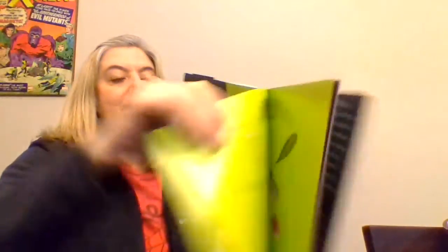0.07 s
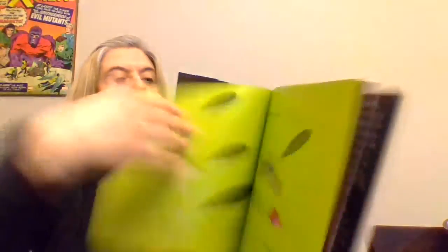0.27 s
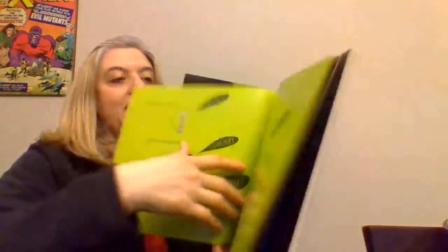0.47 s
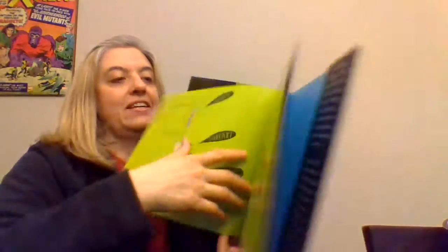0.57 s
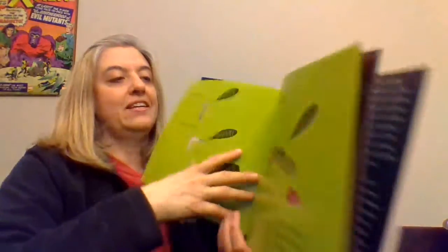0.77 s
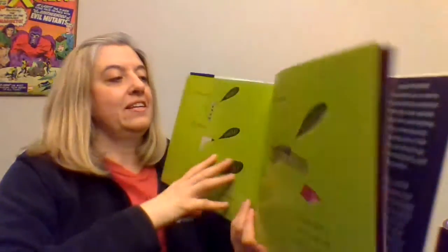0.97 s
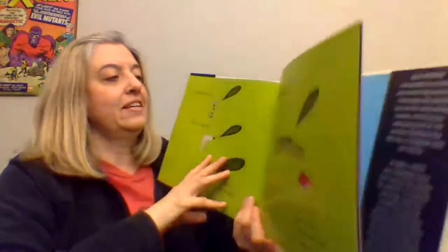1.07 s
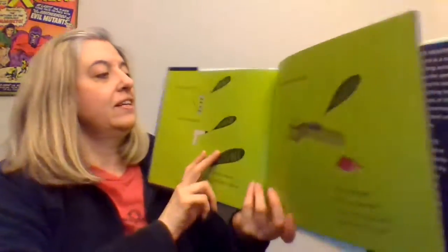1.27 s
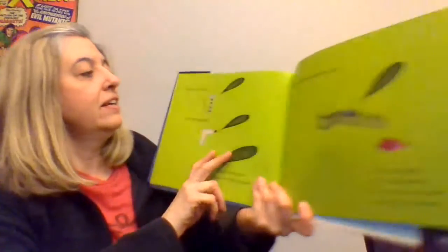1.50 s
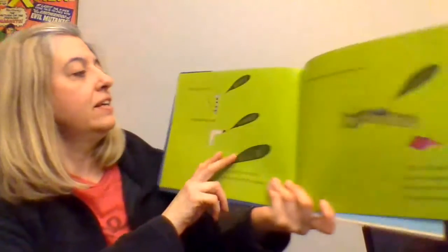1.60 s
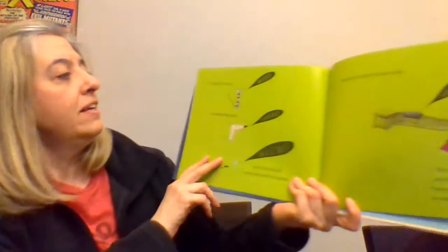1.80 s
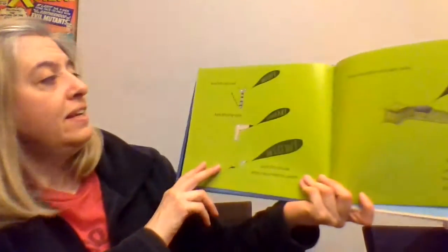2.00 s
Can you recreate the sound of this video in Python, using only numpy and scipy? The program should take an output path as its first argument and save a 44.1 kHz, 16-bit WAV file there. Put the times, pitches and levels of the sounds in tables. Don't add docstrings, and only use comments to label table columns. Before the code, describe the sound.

Close page turn of a glossy picture book: a brief rustle, a dense burst of snapping and buckling paper, then near quiet with soft taps and skin slides on paper, over faint steady room hiss.

```python
import sys
import numpy as np
from scipy import signal
from scipy.fft import rfft, irfft, next_fast_len
from scipy.io import wavfile
from scipy.ndimage import uniform_filter1d

SR = 44100
rng = np.random.default_rng(int(sys.argv[2]) if len(sys.argv) > 2 else 0)


def dump_mix(stems):
    frames = np.atleast_2d(stems).T
    limited = np.clip(frames, -1, 1)
    pcm = np.round(limited * 32767).astype(np.int16)
    wavfile.write(sys.argv[1], SR, pcm)


def to_linear_factor(level_db):
    exponent = np.asarray(level_db, float) / 20
    return 10 ** exponent


N = 90404
LEN = 8192


def unit(x):
    return x / np.sqrt(np.mean(x ** 2, axis=-1, keepdims=True) + 1e-20)


def peak_unit(x, window):
    power = uniform_filter1d(x ** 2, size=window)
    return x / np.sqrt(power.max(axis=1, keepdims=True))


def along(points, hz):
    f, v = np.transpose(points)
    return np.interp(np.log(hz + 1), np.log(f + 1), v)


def curves(rows):
    s, *cols = np.transpose(rows)
    return [np.interp(np.arange(N) / SR, s, c) for c in cols]


def filtered(x, response):
    m = next_fast_len(x.shape[-1] + LEN)
    spectrum = rfft(x, m) * response(np.fft.rfftfreq(m, 1 / SR))
    return irfft(spectrum, m)[..., :x.shape[-1]]


def peak(f, hz, width):
    return 1j * f * width / (hz * hz - f * f + 1j * f * width)


def mode_sum(f, modes):
    return sum((-1) ** k * to_linear_factor(db) * peak(f, hz, width) for k, (hz, width, db) in enumerate(modes))


def grit(shape, spiky):
    size = unit(uniform_filter1d(rng.standard_normal(shape), size=24, axis=-1))
    return unit(rng.standard_normal(shape) * np.exp(spiky * size / 2))


def patchy(x, depth_db, bins=5, frames=10):
    z = signal.stft(x, nperseg=256)[2]
    field = uniform_filter1d(rng.standard_normal(z.shape), max(int(bins), 1), axis=0)
    field = uniform_filter1d(field, int(frames), axis=1)
    gain = to_linear_factor(depth_db * field / field.std())
    return unit(signal.istft(z * gain, nperseg=256)[1][:N])


def placed(times, sounds):
    at = np.round(times * SR).astype(int)[:, None] + np.arange(LEN)
    return np.bincount(at.ravel(), sounds.ravel(), N + LEN)[:N]


def slip_bursts(rows, slap_db, q):
    s, db, hz, length = np.transpose(rows)[:, :, None]
    t = np.arange(LEN) / SR
    attack_s, release_s = 0.0055, 0.058
    kick, kick_s = 1.29, 0.0023
    shape = 1 - np.exp(-t / attack_s) + kick * np.exp(-t / kick_s)
    release = to_linear_factor(-60 * np.maximum(t - length, 0) / release_s)
    push = grit((len(rows), LEN), 0.44) * shape * release
    overtone_hz, overtone_db = 1.96 * hz, -18.5
    slap_low_hz = 430 * hz / 1000
    slap_top_hz = 1950 * (hz / 1000) ** 0.52

    def span(f):
        ring = peak(f, hz, hz / q) ** 2 + to_linear_factor(overtone_db) * peak(f, overtone_hz, hz / q) ** 2
        above = (1j * f / (slap_low_hz + 1j * f)) ** 3
        below = (slap_top_hz / (1j * f + 0.00088) * peak(f, slap_top_hz, 1.28 * slap_top_hz)) ** 3
        return ring + to_linear_factor(slap_db) * above * below

    bursts = peak_unit(filtered(push, span), 200)
    return placed(s[:, 0], to_linear_factor(db - 5) * bursts)


def hush():
    # f/Hz, density level/dB
    spectrum = [(30, -3.5), (340, 5.5), (800, -6.5), (2000, -14.5), (15800, -10.5)]
    noise = filtered(rng.standard_normal(N), lambda f: to_linear_factor(along(spectrum, f)))
    return to_linear_factor(-67.5) * patchy(noise, depth_db=2.0)


def touches():
    # t/s, peak level/dB, pitch f/Hz, length/s
    small_bursts = [(0, -51, 1900, 0.0046), (.115, -41.5, 2100, 0.03), (.165, -35.5, 2000, 0.025),
                    (1.066, -24.5, 680, 0.0067), (1.179, -42, 1200, 0.019), (1.359, -37, 1020, 0.022),
                    (1.39, -36.5, 804, 0.025), (1.2, -50.5, 1350, 0.11), (1.452, -37, 1510, 0.01),
                    (1.614, -42, 816, 0.022), (1.657, -43, 1760, 0.0073), (1.676, -48, 950, 0.052),
                    (1.68, -41.5, 2020, 0.017), (1.847, -48, 2040, 0.011), (.430, -29, 1500, 0.03),
                    (.686, -26, 1960, 0.0069), (1.068, -36.5, 1870, 0.016), (1.360, -40.5, 1800, 0.03)]
    low_hz = 420
    bursts = slip_bursts(small_bursts, slap_db=-21.5, q=1.54)
    return filtered(bursts, lambda f: (f / (f - 1j * low_hz)) ** 4)


def flex():
    # t/s, level/dB
    effort = [(0, -54), (.025, -103), (.07, -73), (.13, -38.5), (.21, -51), (.3, -44.5), (.39, -52),
              (.42, -72.5), (.435, -27.5), (.6, -30.5), (.68, -27.5), (.72, -41), (.78, -35), (.93, -49),
              (.99, -78.5)]
    # f/Hz, width/Hz, level/dB
    sheet_modes = [(537.3, 69, 8), (736, 490, -0.5), (1080, 234, 5), (1500, 120, -1.5), (1793, 170, 1.5)]
    (effort_db,) = curves(effort)
    rustle = filtered(grit(N, 0.79), lambda f: mode_sum(f, sheet_modes) * peak(f, 620, 1500))
    rustle = patchy(rustle, depth_db=4.0, bins=2.5, frames=9.8)
    flutter = filtered(rng.standard_normal(N), lambda f: peak(f, 220, 530) ** 2)
    flutter = patchy(flutter, depth_db=-1, bins=1.5, frames=4.3)
    return to_linear_factor(effort_db) * (rustle + to_linear_factor(-16.5) * flutter)


def slide():
    # t/s, finger speed level/dB, scratch level over it/dB
    turning_hand = [(.04, -111.5, 33), (.06, -56, 10), (.09, -47.5, -1), (.2, -45.5, -4.5), (.32, -45, -7),
                    (.35, -63.5, 3.5), (.45, -55.5, 3.5), (.5, -36.5, -2.5), (.57, -41.5, -2.5),
                    (.7, -39.5, -8), (.74, -50, 4.5), (.77, -40, -6.5), (.81, -53, 6), (.84, -44.5, -5),
                    (.92, -50.5, -6)]
    # t/s, finger speed level/dB, scratch level over it/dB
    holding_hand = [(1.05, -46.5, -7.5), (1.2, -59.5, 1.5), (1.29, -49.5, -2), (1.33, -51, 0),
                    (1.345, -54.5, -5), (1.4, -47, -5.5), (1.47, -57, 0.5), (1.57, -64, 1.5),
                    (1.646, -55.5, -9.5), (1.664, -50, 0), (1.84, -50.5, -9), (1.853, -47.5, -2),
                    (1.899, -42.5, -1.5), (1.94, -55, -2.5), (2.05, -73, 1)]
    # f/Hz, density level/dB
    gloss = [(5000, -86), (7000, -3.5), (8000, -8.5), (9300, -1.5), (12000, -2), (14600, 3.5),
             (16000, -3.5)]
    # f/Hz, width/Hz, level/dB
    scratch_modes = [(2490, 1200, -6.5), (3300, 196, 7), (4000, 1070, 2.5), (5160, 800, 2.5),
                     (6440, 234, 6)]
    speed_db, scratch_db = curves(turning_hand + holding_hand)
    hiss = filtered(grit(N, 0.14), lambda f: to_linear_factor(along(gloss, f)))
    hiss = patchy(hiss, depth_db=2.0, bins=77, frames=14)
    scratch = filtered(grit(N, 0.33), lambda f: mode_sum(f, scratch_modes) * peak(f, 4100, 10000))
    scratch = patchy(scratch, depth_db=5, bins=1.2, frames=30)
    crackle = unit(filtered(grit(N, 0.9), lambda f: peak(f, 3020, 3300) ** 2))
    flying = to_linear_factor(-6.5) * scratch + crackle
    held = scratch + to_linear_factor(-12) * crackle
    turning = np.arange(N) / SR < turning_hand[-1][0]
    return to_linear_factor(speed_db) * (hiss + to_linear_factor(scratch_db) * np.where(turning, flying, held))


def buckles():
    # t/s, peak level/dB, pitch f/Hz, length/s
    page_turn = [(0.056, -41, 1870, 0.035), (0.084, -38, 1030, 0.013), (0.1, -27.5, 2180, 0.027),
                 (0.139, -31, 2160, 0.027), (0.15, -42, 1100, 0.022), (0.23, -28, 1070, 0.013),
                 (0.262, -25.5, 1370, 0.007), (0.296, -28.5, 463, 0.013), (0.322, -26, 620, 0.013),
                 (0.413, -27, 750, 0.045), (0.427, -19, 910, 0.0067), (0.445, -20, 970, 0.014),
                 (0.463, -35.5, 630, 0.012), (0.489, -26.5, 685, 0.041), (0.522, -25.5, 1080, 0.0073),
                 (0.545, -25.5, 525, 0.011), (0.56, -32.5, 900, 0.01), (0.607, -25.5, 1300, 0.03),
                 (0.627, -19.5, 497, 0.0245), (0.64, -23, 970, 0.018), (0.664, -20, 890, 0.044),
                 (0.698, -25.5, 1080, 0.0035), (0.718, -24, 1000, 0.038), (0.752, -24, 536, 0.0087),
                 (0.774, -19, 960, 0.004), (0.805, -32.5, 1060, 0.017), (1.668, -42, 595, 0.04)]
    return slip_bursts(page_turn, slap_db=-6.5, q=1.9)


def snaps():
    # t/s, peak level/dB, pitch f/Hz, sizzle level/dB, fray length/s
    creases = [(.086, -25, 3380, -5, 0.0036), (0.137, -24, 3700, -1, 0.0027), (0.146, -27, 3550, 0, 0.0013),
               (0.155, -23.5, 4470, -4, 0.0023), (0.231, -25.5, 3470, -6, 0.014),
               (0.244, -21.5, 3400, -0.5, 0.014), (0.269, -11, 3900, 0, 0.01),
               (0.4704, -18, 5070, 0.5, 0.0023), (.487, -21, 2970, -2, 0.0031),
               (0.4966, -15, 4330, -0.5, 0.0014), (0.511, -22.5, 2950, -2.5, 0.0052),
               (0.526, -13.5, 2980, -3, 0.014), (0.545, -20.5, 4000, -8, .005),
               (.5950, -20.5, 4440, -2.5, 0.0034), (0.6113, -10.5, 7240, -19.5, 0.0018),
               (0.61, -10.5, 2500, -16.5, 0.0035), (0.622, -24, 5800, -12.5, 0.0044),
               (.663, -19, 2900, -10, 0.0027), (.688, -23.5, 3950, -7, 0.0029),
               (.7540, -9, 3700, -7.5, 0.0067), (0.829, -26, 4030, -6.5, 0.0044),
               (1.0656, -28, 3160, -7.5, 0.011), (1.657, -27.5, 3800, -10.5, 0.0027),
               (1.6695, -35, 4130, -10.5, 0.0063)]
    s, db, hz, sizzle_db, fray_s = np.transpose(creases)[:, :, None]
    lead_s, t60_s, q = 0.03, 0.015, 2.38
    t = np.arange(LEN) / SR - lead_s
    core = (t > 0) * to_linear_factor(-60 * abs(t) / t60_s) * grit((len(creases), LEN), 1.0)
    fray = 0.42 * np.exp(-(t / fray_s) ** 2) * grit((len(creases), LEN), 1.0)

    def crease(f):
        return peak(f, hz, hz / q) + to_linear_factor(sizzle_db - 3) * peak(f, 14900, 10000)

    crack = peak_unit(filtered(core + fray, crease), 40)
    return placed(s[:, 0] - lead_s, to_linear_factor(db - 12) * crack)


def pops():
    # t/s, peak level/dB, pitch f/Hz, t60/s
    flips = [(0.087, -30.5, 1020, 0.026), (.1345, -17.5, 2280, 0.011), (0.1371, -25.5, 940, 0.014),
             (.145, -22, 2010, 0.015), (.157, -29, 1200, 0.013), (.163, -19.5, 790, 0.0079),
             (0.2415, -27, 1130, 0.0072), (0.271, -24, 1144, 0.061), (0.2729, -18.5, 1676, .02),
             (0.284, -36, 1400, 0.0051), (.306, -20.5, 634, 0.012), (0.3318, -27, 600, 0.031),
             (.340, -33, 550, 0.025), (0.4273, -8, 973, 0.011), (.471, -27, 900, 0.012),
             (.513, -17.5, 990, 0.0077), (.519, -16, 1080, 0.0098), (0.531, -27, 930, .015),
             (.555, -21, 498, 0.069), (.578, -16, 533, .03), (.590, -21, 910, 0.017),
             (0.6119, -13.5, 1200, .025), (.625, -11.5, 640, 0.0073), (0.684, -13, 1080, 0.033),
             (.6875, -16.5, 1980, 0.024), (.6938, -7, 1070, 0.02), (0.754, -17, 1080, 0.044),
             (.770, -20, 1200, 0.031), (.795, -24, 996, 0.029), (1.3595, -41, 800, 0.028),
             (1.6145, -41.5, 890, 0.017), (1.6625, -28.5, 980, .03), (1.669, -26, 1001, 0.04),
             (1.691, -37, 1010, 0.0067), (1.696, -29, 1950, 0.01)]
    s, db, hz, t60 = np.transpose(flips)[:, :, None]
    t = np.arange(LEN) / SR
    rise_cycles, overtone, overtone_db = 0.58, 1.735, -6.5
    decay_db = -60 * t / t60
    rise = 1 - np.exp(-hz * t / rise_cycles)
    upper = to_linear_factor(overtone_db + decay_db) * np.sin(2 * np.pi * overtone * hz * t)
    ring = np.sin(2 * np.pi * hz * t) - upper
    return placed(s[:, 0], to_linear_factor(db + decay_db) * rise * ring)


def thumps():
    # t/s, peak level/dB, pitch f/Hz
    pushes = [(0.133, -23.5, 249), (0.148, -50, 70), (0.287, -44, 83.6), (0.428, -31.5, 263),
              (0.473, -33, 115), (0.497, -32.5, 70.5), (0.615, -30, 144), (0.762, -48, 120),
              (1.066, -33.5, 113), (1.358, -50.5, 118), (1.414, -46, 124), (1.614, -42.5, 174),
              (1.648, -46.5, 101), (1.697, -46, 109)]
    s, db, hz = np.transpose(pushes)[:, :, None]
    cycles = hz * np.arange(LEN) / SR
    rise_cycles, t60_cycles = 0.8, 15.2
    puff = unit(filtered(rng.standard_normal(cycles.shape), lambda f: peak(f, 1.05 * hz, hz) ** 2))
    shape = (1 - np.exp(-cycles / rise_cycles)) * to_linear_factor(-60 * cycles / t60_cycles)
    return placed(s[:, 0], to_linear_factor(db) * shape * (np.sin(2 * np.pi * cycles) + 0.49 * puff))


def rub():
    # t/s, level/dB
    pressure = [(.8, -84), (.95, -57), (1.16, -58.5), (1.34, -55.5), (1.5, -53), (1.58, -66), (1.75, -57.5),
                (1.8, -73.5), (1.87, -57.5), (2.05, -97)]
    # f/Hz, width/Hz, level/dB
    stack_modes = [(812, 290, -0.5), (1200, 300, -3), (1800, 240, 0), (2390, 660, -26.5)]
    (pressure_db,) = curves(pressure)
    drag = filtered(grit(N, 0.44), lambda f: mode_sum(f, stack_modes) * peak(f, 1000, 2150) ** 2)
    return to_linear_factor(pressure_db) * patchy(drag, depth_db=4, bins=1.2, frames=23)


def room(x):
    # f/Hz, t60/s
    decay = [(100, 0.53), (1000, 0.12), (8000, 0.051)]
    hz, t, z = signal.stft(rng.standard_normal(SR // 2), SR, nperseg=256)
    fading = z * to_linear_factor(-60 * t / along(decay, hz)[:, None])
    tail = signal.istft(fading, SR, nperseg=256)[1]
    delayed = np.pad(x, (200, 0))
    return signal.fftconvolve(delayed, tail / np.linalg.norm(tail))[:N]


def scene():
    hits = touches() + buckles() + snaps() + pops()
    mono = hits + to_linear_factor(-10.5) * room(hits)
    mono = mono + hush() + flex() + slide() + thumps() + rub()
    return np.array([mono, mono])


def top_cut(x):
    return signal.sosfilt(signal.butter(12, 16360, fs=SR, output="sos"), x)


def record(dry):
    dip_hz, dip_width_hz, dip_db, top_hz = 7540, 290, -3, 15850

    def recorder(f):
        dip = to_linear_factor(dip_db * np.exp(-((f - dip_hz) / dip_width_hz) ** 2))
        return dip * (f < top_hz)

    wet = filtered(dry, recorder)
    return top_cut(wet)


dry = scene()
out = record(dry)
dump_mix(out)
```